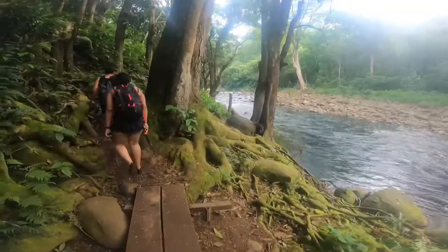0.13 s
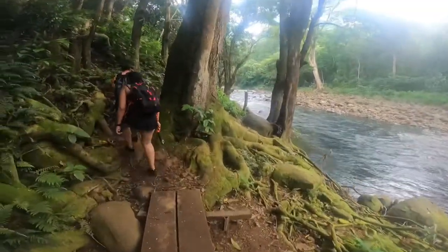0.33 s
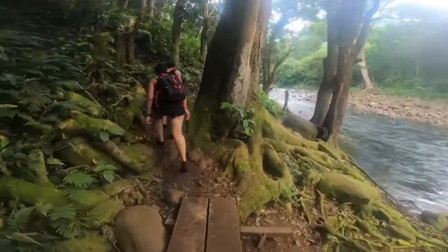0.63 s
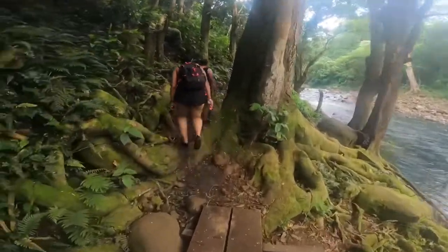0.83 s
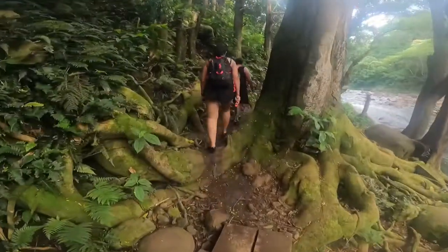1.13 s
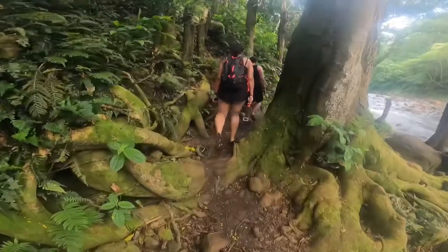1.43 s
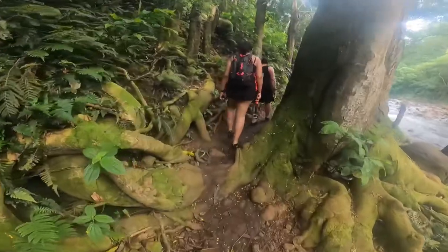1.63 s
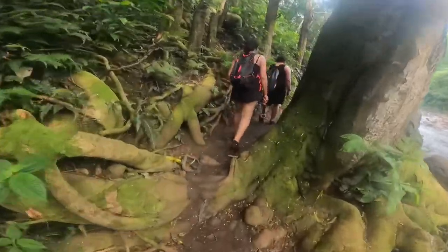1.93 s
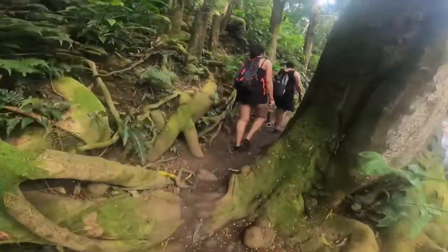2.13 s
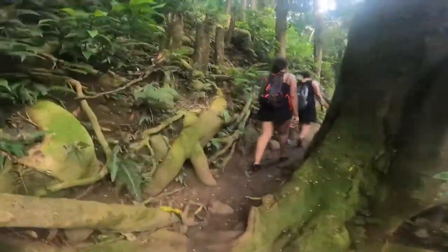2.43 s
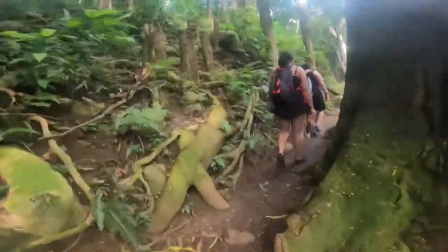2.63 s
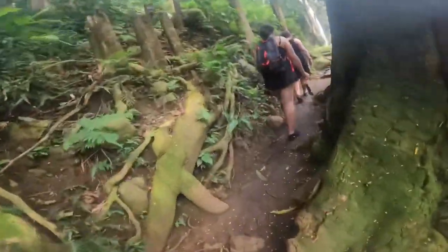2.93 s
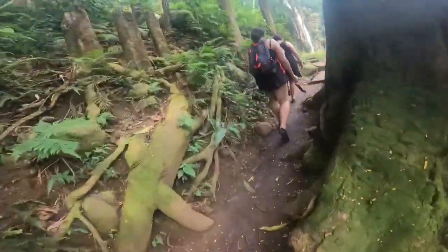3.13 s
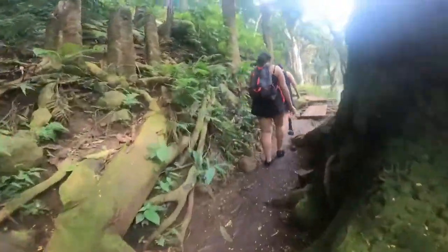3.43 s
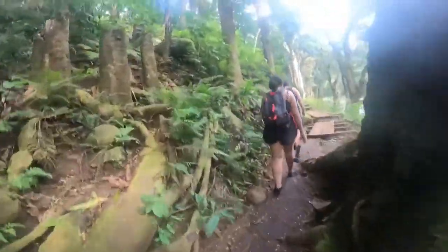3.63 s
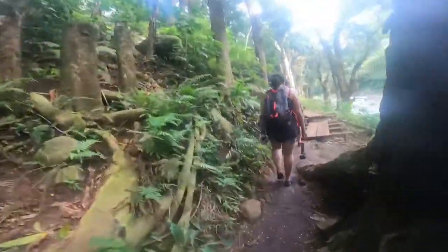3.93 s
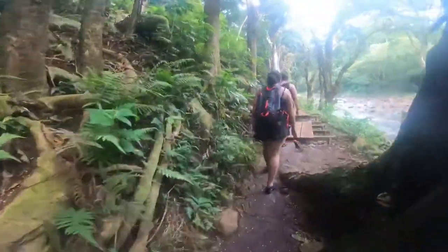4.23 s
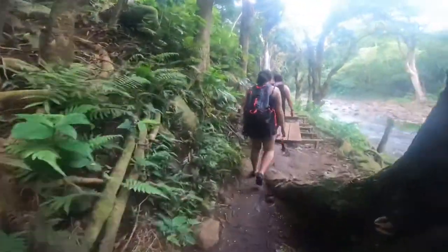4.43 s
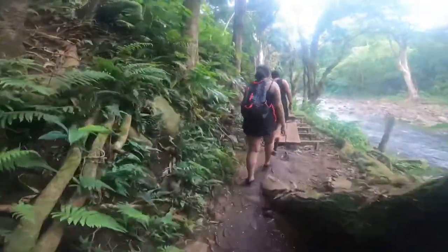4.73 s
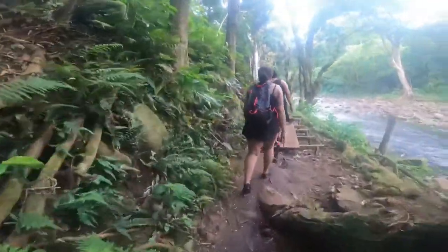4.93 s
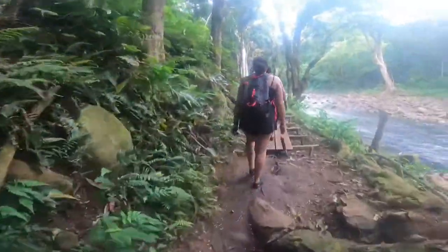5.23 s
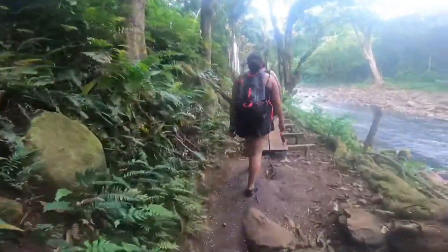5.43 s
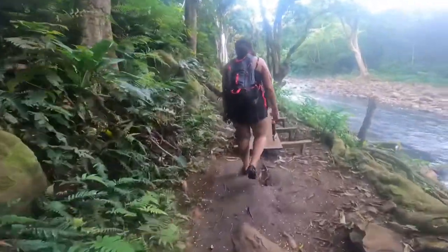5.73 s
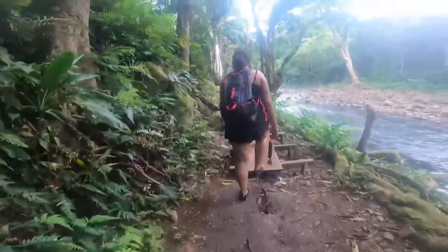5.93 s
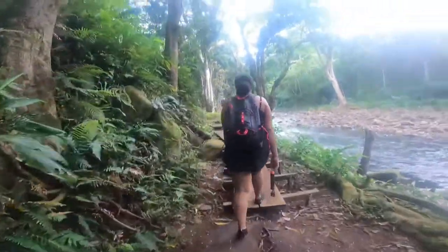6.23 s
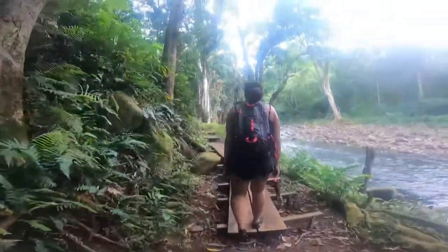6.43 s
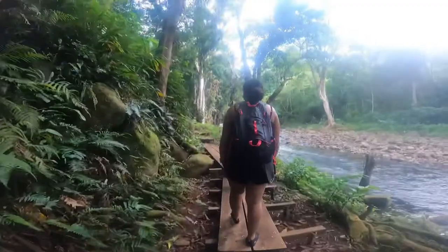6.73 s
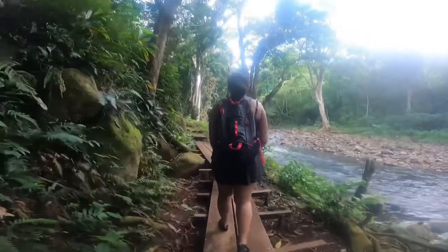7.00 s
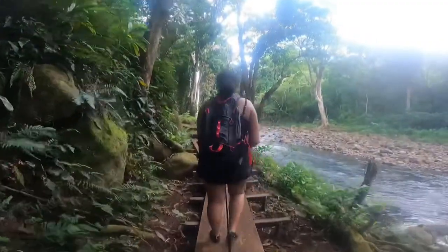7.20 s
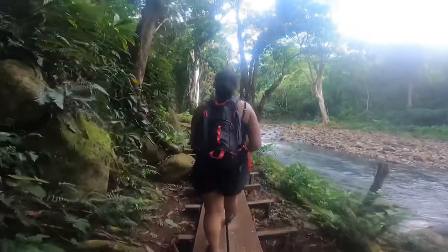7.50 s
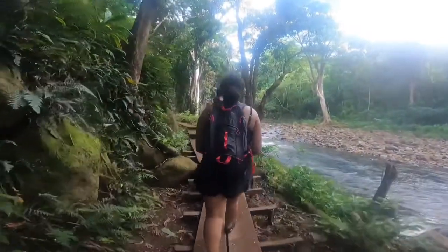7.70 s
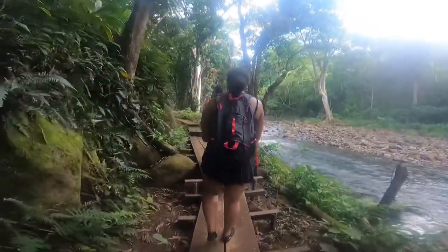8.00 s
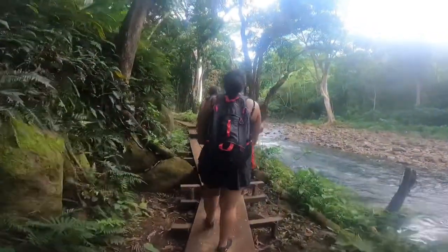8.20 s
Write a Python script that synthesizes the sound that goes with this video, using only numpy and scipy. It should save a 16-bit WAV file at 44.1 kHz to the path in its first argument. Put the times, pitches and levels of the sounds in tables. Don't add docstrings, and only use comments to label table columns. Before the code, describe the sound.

Close, boxy handling noise dominates: pole thumps and brief low ringing at uneven walking steps, skin rubbing on plastic, soft hollow knocks and dry joint clicks. A hard clack comes early, heavy bumps follow in the middle, then lighter ones with another loud click near the end. A tiny twig snap and soft leaf brush are nearly hidden. Behind them, a shallow river gives a faint continuous wash, slightly clearer later. Stereo microphones sit inside a sealed plastic case outdoors.

```python
import sys
import numpy as np
from scipy import signal
from scipy.fft import rfft, irfft, next_fast_len
from scipy.io import wavfile
from scipy.ndimage import uniform_filter1d

SR = 44100
rng = np.random.default_rng(int(sys.argv[2]) if len(sys.argv) > 2 else 0)


def waveform_to_disk(signal):
    frames = np.transpose(np.atleast_2d(signal))
    scaled = np.clip(frames, -1, 1) * 32767
    samples = np.round(scaled).astype(np.int16)
    wavfile.write(sys.argv[1], SR, samples)


def invert_db(x):
    u = np.asarray(x, float) / 20
    return 10 ** u


N = 368676

# time in seconds, peak in dB, low modes and upper modes in dB
# against that peak, left minus right in dB.
CLICKS = [(0.404, -23, -23, -14, -18), (0.693, -21.5, -16, -11, -2), (1.308, -11, -20, -6, 0),
          (1.417, -24, -22, -14, 1), (1.89, -26, -32, -7, 3), (2.892, -29.5, 2, -5, -7),
          (3.621, -23.5, -26, -13, -3), (3.663, -32, -21, 2, -4.0), (3.672, -23.5, -31, -4.5, -9),
          (3.737, -33.5, -6, 6, 2.0), (4.468, -25, -19, -1, -4.5), (4.475, -23, -16, -10, -13),
          (4.491, -15.5, -32, -4, 7), (4.53, -27, -12, -7, 5), (4.561, -30, -21, 5, 1),
          (4.58, -22.5, -27, -4, 6), (4.733, -29, -3, -13, 7), (4.7763, -11.5, -4, -4, 5.5),
          (4.91, -27.5, -9, 1, 19), (5.37, -18.5, -30, -7, 4), (5.394, -28, -14, -4, 6),
          (5.453, -13.5, -22, -4.5, 7), (2.531, -26, -10, 2, 2), (2.549, -23, -10, 2, 2),
          (4.614, -32, -20, 4, 2), (4.955, -31, -20, 4, 2), (6.195, -22.5, -4, 2, -5),
          (7.334, -13, -3.5, -7.5, -1), (2.496, -31, -20, 6, 3), (2.968, -31, -20, 5, 2),
          (3.099, -34, -20, 7, 2), (5.665, -32, -20, 5, 2)]
# time in seconds, peak in dB.
JOLTS = [(0.689, -34), (1.309, 1), (1.884, -13), (2.464, -5), (3.235, -9.5), (3.267, -4.5), (3.776, -6),
         (4.841, -7), (5.746, -10), (7.014, -19.5), (7.84, -20)]
OPPOSITE = np.array([[1], [-1]])


def rms_one(x):
    return x / np.sqrt(np.mean(x ** 2) + 1e-20)


def low_pass(x, cut_hz, order):
    return signal.sosfilt(signal.butter(order, cut_hz, fs=SR, output="sos"), x)


def band(x, low_hz, high_hz):
    return signal.sosfilt(signal.butter(2, [low_hz, high_hz], "band", fs=SR, output="sos"), x)


def steady(x, window_s, share):
    power = np.atleast_2d(rms_one(x) ** 2).mean(axis=0)
    power = uniform_filter1d(power, int(window_s * SR))
    return rms_one(x / (power + .02) ** (.5 * share))


def drift(rate_hz):
    r = np.exp(-80 * np.pi * rate_hz / SR)
    white = rng.standard_normal(N // 40 + 2002)
    slow = signal.lfilter([1], [1, -2 * r, r * r], white)[2000:]
    return np.interp(np.arange(N) / 40, np.arange(len(slow)), rms_one(slow))


def resonate(x, hz, width_hz):
    r = np.exp(-np.pi * width_hz / SR)
    feedback = [1, -2 * r * np.cos(2 * np.pi * hz / SR), r * r]
    return signal.lfilter([(1 - r * r) / 2, 0, (r * r - 1) / 2], feedback, x)


def body(x, modes, flicker_db=0):
    out = 0
    for k, (hz, width_hz, left_db, right_db) in enumerate(modes):
        level_db = np.array([[left_db], [right_db]])
        if flicker_db:
            level_db = level_db + flicker_db * drift(10.3)
        out = out + (-1) ** k * invert_db(level_db) * resonate(x, hz, width_hz)
    return out


def grains(per_s, spread_db):
    sizes = invert_db(spread_db * np.minimum(rng.exponential(1, N), 4)) * rng.choice([-1, 1], N)
    return rms_one(sizes * (rng.random(N) < per_s / SR))


def ring(hits, hz, t60_s):
    r = invert_db(-60 / (t60_s * SR))
    w = 2 * np.pi * hz / SR
    return signal.lfilter([0, np.sin(w)], [1, -2 * r * np.cos(w), r * r], hits + 1e-18)


def hit_train(times, levels_db):
    hits = np.zeros(N)
    hits[(np.atleast_1d(times) * SR).astype(int)] = invert_db(levels_db)
    return hits


def around(times, before_s, after_s, depth_db):
    dip = np.zeros(N)
    for s, db in zip(times, depth_db + 0 * times):
        span = slice(round((s - before_s) * SR), round((s + after_s) * SR))
        dip[span] = np.minimum(dip[span], db)
    return uniform_filter1d(dip, 150)


def before_jolt_db():
    s = np.array(JOLTS)[:, 0]
    first_contact = np.diff(s, prepend=0) > .1
    return around(s[first_contact], .035, 0, -10)


def swells(times, peaks_db, falls_s, shape):
    rise_share, roundness, rest_db = shape
    since = np.arange(0, N + 32, 32) / SR - times[:, None]
    away = np.where(since < 0, -since / rise_share, since) / falls_s[:, None]
    events = invert_db(2 * (peaks_db[:, None] - 20 * away ** roundness))
    return np.vstack([events, invert_db(2 * rest_db) + 0 * since[0]])


def per_sample(x):
    return np.interp(np.arange(N) / 32, np.arange(len(x)), x)


def envelope(*events):
    return per_sample(np.sqrt(swells(*events).sum(axis=0)))


def pole():
    # peak time in seconds, level in dB, seconds to fall 20 dB.
    swings = [(0.165, -24.5, 0.325), (0.338, -20.7, 0.049), (0.496, -27.8, 0.146), (0.686, -14.6, 0.036),
              (0.808, -28.8, 0.397), (1.183, -26.6, 0.379), (1.318, -18.8, 0.047), (1.84, -28.2, 0.151),
              (1.847, -35.9, 0.582), (1.983, -20.3, 0.062), (2.334, -32.5, 0.107), (2.63, -27.2, 0.44),
              (3.076, -29.5, 0.129), (3.283, -24.8, 0.031), (3.441, -27.5, 0.344), (3.828, -26.3, 0.268),
              (4.251, -21.8, 0.405), (4.451, -20.6, 0.101), (4.844, -21.7, 0.336), (5.228, -28.3, 0.464),
              (5.299, -17.8, 0.03), (5.9, -31, 0.2), (6.183, -31.7, 0.157), (6.42, -25.3, 0.086),
              (6.56, -35.2, 0.357), (6.91, -33.0, 0.287), (7.076, -20.3, 0.117), (7.533, -36.7, 0.476),
              (2.19, -35, .06), (2.68, -23, .08), (3.44, -23, .06), (5.86, -25, .09), (7.62, -27, .1),
              (7.71, -30, .06), (7.99, -40, .06), (4.35, -24, .07), (4.3, -23, .05), (7.831, -26.6, 0.053),
              (8.287, -26.8, 0.208)]
    # peak time in seconds, level in dB, seconds to fall 20 dB.
    thuds = [(0.208, -32.2, 0.25), (0.508, -28.4, 0.036), (0.948, -39.1, 0.427), (1.315, -25.8, 0.189),
             (1.854, -29.1, 0.131), (2.19, -32.8, 0.043), (2.477, -19.2, 0.11), (2.583, -11.9, 0.09),
             (2.889, -29.0, 0.377), (3.063, -25.7, 0.033), (3.243, -28.7, 0.492), (3.257, -6.6, 0.056),
             (3.801, -19.3, 0.149), (4.116, -40.8, 0.12), (4.446, -27.6, 0.11), (4.838, -27.8, 0.384),
             (4.844, -10.7, 0.057), (4.971, -19.3, 0.025), (5.284, -32.0, 0.032), (5.406, -32.2, 0.157),
             (5.75, -15.5, 0.069), (6.193, -31.4, 0.226), (6.429, -31.8, 0.171), (6.757, -27.9, 0.103),
             (7.015, -22.0, 0.095), (7.389, -47.7, 0.455), (0.295, -27, .035), (1.31, -21, .04),
             (1.885, -32, .04), (2.79, -33, .04), (3.46, -34, .05), (5.12, -37, .05), (6.16, -33, .05),
             (6.33, -35, .04), (7.52, -42, .05), (2.31, -48, .05), (7.855, -30.9, 0.077),
             (8.326, -23.2, 0.096)]
    # peak time in seconds, level in dB,
    # seconds to fall 20 dB, pitch in Hz.
    bend_events = [(0.21, -35.8, 0.1, 114.9), (0.708, -28.5, 0.065, 120.0), (0.955, -34.0, 0.331, 124.4),
                   (1.327, -16.3, 0.112, 114.4), (1.549, -37.6, 0.055, 117.1), (1.877, -28.1, 0.147, 114.2),
                   (2.485, -12.6, 0.065, 117.8), (2.62, -17.0, 0.062, 112.8), (2.851, -17.6, 0.088, 120.4),
                   (2.945, -13.7, 0.074, 122.1), (3.1, -31.0, 0.048, 115.3), (3.249, -26.0, 0.27, 114.7),
                   (3.687, -31.3, 0.241, 114.3), (3.801, -18.9, 0.064, 118.9), (3.993, -29.9, 0.087, 120.8),
                   (4.189, -26.7, 0.075, 107.7), (4.403, -33.8, 0.38, 118.5), (4.86, -18.6, 0.04, 104.1),
                   (4.93, -29.4, 0.535, 121.7), (4.969, -18.6, 0.057, 118.9), (5.432, -28.6, 0.119, 129.2),
                   (5.79, -12.3, 0.079, 116.1), (5.997, -38.7, 0.072, 124.1), (6.24, -20.9, 0.128, 118.1),
                   (6.493, -26.9, 0.075, 113.3), (6.793, -19.1, 0.073, 114.4), (7.05, -29.8, 0.1, 114.3),
                   (0.09, -40, .05, 115), (0.3, -33, .05, 118), (0.86, -34, .05, 120),
                   (1.14, -37, .05, 118), (2.24, -44, .05, 118), (2.33, -44, .05, 118),
                   (4.48, -31, .04, 118), (4.57, -32, .05, 118), (5.29, -32, .05, 118),
                   (6.61, -46, .05, 118), (7.15, -26, .06, 118), (7.24, -31, .06, 118),
                   (7.54, -30, .05, 120), (7.7, -46, .05, 118), (8.18, -41, .05, 118),
                   (7.4, -18.4, 0.11, 114.8), (7.87, -35.6, 0.057, 113.7), (8.34, -20.8, 0.11, 114.9)]
    # frequency in Hz, level in dB, t60 in seconds.
    pole_modes = [(75, -17, 0.18), (380, -5, .05)]
    bend_shape = (.76, 1.34, -59)
    quiet = invert_db(before_jolt_db())
    white = rng.standard_normal((2, N))

    sway = steady(band(white[0], 9.0, 27.5), 0.032, 0.77)
    sway = sway * envelope(*np.transpose(swings), (.52, 2.5, -46))
    thud = steady(band(white[1], 52.0, 112.7), .03, 0.44)
    thud = thud * envelope(*np.transpose(thuds), (.57, 1.09, -66))
    thud = low_pass(thud, 165, 2)

    *bends, hz = np.transpose(bend_events)
    power = swells(*bends, bend_shape)[:-1] + 1e-12
    pitch_hz = per_sample(hz @ power / power.sum(axis=0))
    pitch_hz = pitch_hz * (1 + 0.0423 * drift(14.56))
    bent = envelope(*bends, bend_shape) * invert_db(2.5 * drift(10.0)) * quiet * np.sqrt(2)

    hits = hit_train(*np.transpose(JOLTS))
    kick_db, kick_t60_s, kick_rise_s = -5, .075, .003
    fall, rise = invert_db(-60 / (kick_t60_s * SR)), np.exp(-1 / (kick_rise_s * SR))
    softened = signal.lfilter([1 - rise], [1, -rise], hits + 1e-18)
    kicked = invert_db(kick_db) * signal.lfilter([1], [1, -fall], softened)
    bend = np.hypot(bent, kicked) * np.sin(2 * np.pi * np.cumsum(pitch_hz) / SR)

    struck = sum(invert_db(level_db - 12.5) * ring(hits, hz, t60_s) for hz, level_db, t60_s in pole_modes)
    return (sway + thud * quiet + bend + struck) * invert_db(0.17 * OPPOSITE)


def rub():
    # peak time in seconds, level in dB, seconds to fall 20 dB,
    # brightness in dB.
    scuffs = [(0.896, -34.4, 0.14, -6.5), (1.306, -25, 0.067, -3.6), (1.898, -30.4, 0.039, 3.2),
              (2.561, -16.5, 0.085, 0.6), (2.63, -18.2, 0.037, -6.3), (3.248, -20.2, 0.09, -9.9),
              (3.803, -24.9, 0.069, -1.6), (4.15, -29.4, 0.075, -4.9), (4.85, -16.0, 0.038, -18.1),
              (5.442, -34.4, 0.081, 3.2), (5.771, -28.7, 0.098, 0.0), (6.203, -25.9, 0.118, -1.6),
              (6.756, -28.4, 0.08, -2.5), (7.03, -28.8, 0.069, -5.6), (7.337, -27.3, 0.033, -13.6),
              (8.324, -27.3, 0.136, -5.0)]
    fidgets = [(0.079, -33.1, 0.035, 0.3), (0.166, -40.2, 0.063, 0.5), (0.272, -40.2, 0.039, 2.7),
               (0.672, -32.4, 0.072, -18.3), (1.239, -36.1, 0.114, -1.6), (1.658, -38.4, 0.089, -16.3),
               (1.961, -40.1, 0.073, 0.4), (2.446, -33.0, 0.137, -10.8), (2.751, -32.4, 0.082, -2.3),
               (2.829, -30.6, 0.079, -2.9), (2.925, -27.4, 0.062, -2.9), (3.04, -39.4, 0.145, -2.4),
               (3.513, -39.2, 0.288, -13.9), (3.757, -31.4, 0.078, -7.8), (3.954, -41.8, 0.215, -12.4),
               (4.287, -33.1, 0.115, -13.1), (4.462, -36.1, 0.182, -4.8), (4.666, -35.6, 0.085, -5.1),
               (4.735, -31.0, 0.119, -4.6), (4.903, -26.0, 0.051, -11.0), (4.952, -35.3, 0.134, -3.4),
               (5.979, -36.6, 0.059, 0.7), (6.321, -32.0, 0.038, 0.5), (6.464, -35.1, 0.191, -4.7),
               (7.088, -34.0, 0.057, -3.3), (7.518, -34.7, 0.054, -3.4), (7.581, -31.0, 0.034, -13.9),
               (0.7, -36, .03, -10), (0.95, -33, .04, -10), (1.14, -48, .04, -5), (1.53, -49, .04, -5),
               (2.497, -36, .03, 4), (2.97, -42, .02, 6), (3.1, -46, .02, 8), (3.13, -46, .02, 8),
               (3.45, -37, .04, -10), (3.56, -44, .03, 5), (4.06, -44, .03, 0), (5.07, -42, .03, -10),
               (5.14, -44, .04, -10), (5.25, -46, .04, -8), (5.33, -46, .04, -5), (5.67, -48, .02, 10),
               (5.89, -41, .03, -8), (6.44, -32, .04, -8), (6.93, -50, .03, 8), (7.4, -45, .04, -10),
               (7.9, -42, .03, -8), (7.824, -45.0, 0.336, -10.6), (8.119, -45.2, 0.18, -1.4)]
    # frequency in Hz, width in Hz, left in dB, right in dB.
    grip_low = [(212, 117.8, -14, -11.5), (314.4, 29.7, -7.5, 0), (358, 42, -1, -1.5), (413, 42.6, -1.5, 1),
                (506, 49.9, -4.5, -3)]
    grip_high = [(740, 197, -1, 0.5), (976, 63, 11, 7), (1157.4, 143, 8.5, 6.5), (1710, 240, 8, -0.5),
                 (2128, 200, 1, -12), (3035, 410, -7, -13), (3660, 200, -13, -13), (5560, 2100, -25, -27)]
    grip_twist = [(517, 135, -7.5, -10), (728, 100, -18, -17.5)]
    rise, roundness, rest_db = (.6, 1.76, -59)
    bright_at_rest_db = 3
    times, rub_db, falls_s, bright_db = np.transpose(scuffs + fidgets)

    clumps = invert_db(2.4 * drift(30.0))
    slips = grains(1400, 2.5) + 0.36 * rng.standard_normal(N)
    apart = invert_db(-9) * np.array([grains(1400, 3.0), grains(1400, 3.0)])
    soft = low_pass(clumps * (slips + apart), 5200, 4)

    s, peak_db = np.transpose(CLICKS)[:2]
    dip_db = around(s, .025, .025, -np.clip(1.2 * (peak_db + 32), 3, 5))

    low = steady(body(soft, grip_low) - OPPOSITE * body(soft, grip_twist), 0.059, 0.21)
    low = low * envelope(times, rub_db, falls_s, (rise, roundness, rest_db))
    bright = envelope(times, rub_db + bright_db, falls_s, (rise, roundness, rest_db + bright_at_rest_db))
    high = bright * steady(body(soft, grip_high), 0.023, 0.45)
    return low * invert_db(.55 * dip_db + before_jolt_db()) + high * invert_db(dip_db - 1.5)


def clicks():
    # frequency in Hz, level in dB, t60 in seconds.
    joint = [
        [(998, -2, 0.036), (1196, -1.5, .03)],
        [(561, -0.5, .04), (800, -2.5, 0.028)],
        [(1370, -10.5, 0.0094), (1690, 5, 0.013)],
        [(3500, 5.5, 0.014), (5100, -16, .012), (7200, -20, .01)],
    ]
    touch = np.pad(np.hanning(6) / np.hanning(6).sum(), (0, 3000))
    chance = rng.uniform(-1, 1, (len(CLICKS), 10))
    out = np.zeros((2, N))
    for (s, peak_db, low_db, upper_db, pan_db), draw in zip(CLICKS, chance):
        chatter_s = .0022 + .001 * draw[9]
        contact = touch + invert_db(-10) * np.roll(touch, round(chatter_s * SR))
        rung = []
        for g, group in enumerate(joint):
            total = 0
            for k, (hz, level_db, t60_s) in enumerate(group):
                lean = 1 + 0.27 * (-1) ** k * OPPOSITE
                shifted_hz = hz * (1 + .025 * draw[2 * g + k])
                total = total + invert_db(level_db) * lean * ring(contact, shifted_hz, t60_s)
            rung.append(total)
        middle, low, upper, top = rung
        top_db = -16.5 - .15 * (peak_db + 20) + np.clip(2 * (upper_db + 5), -8, 2)
        tick = middle - invert_db(low_db) * low - invert_db(upper_db) * upper + invert_db(top_db) * top
        out[:, round(s * SR):][:, :len(contact)] += invert_db(peak_db - 6.5 + OPPOSITE * pan_db / 2) * tick
    return out


def knocks():
    # start in seconds, peak in dB, pitch in Hz.
    palm_hits = [(0.932, -27, 390), (1.306, -16, 382), (2.535, -14, 361), (2.605, -16, 339),
                 (3.225, -18, 409), (3.264, -12, 404), (3.78, -17, 371), (4.131, -26, 390),
                 (4.255, -30, 436), (4.665, -26, 366), (4.84, -16, 431), (4.898, -24, 415),
                 (4.974, -28, 415), (5.752, -21, 358), (6.227, -20, 420), (6.761, -23, 487),
                 (7.031, -22, 409), (7.085, -26, 401), (7.576, -30, 398), (8.282, -23, 409)]
    level_db, t60_s, soft_s = -6, .11, .008
    t = np.arange(6000) / SR
    out = np.zeros(N)
    for s, peak_db, hz in palm_hits:
        fade = np.minimum(t / soft_s, 1) * invert_db(peak_db + level_db - 60 * t / t60_s)
        tone = fade * np.sin(2 * np.pi * hz * t)
        start = round(s * SR)
        out[start:][:len(t)] += tone[:N - start]
    return out * invert_db(-1.5 * OPPOSITE)


def undergrowth():
    # start in seconds, level in dB, frequency in Hz, t60 in seconds.
    twig_snap = [
        (3.62, -37, 5800, .014),
    ]
    # start in seconds, level in dB, frequency in Hz, t60 in seconds.
    leaf_puff = [
        (5.572, -25, 260, .035),
    ]
    s, level_db, hz, t60_s = twig_snap[0]
    snap = hit_train(s, level_db)
    twig = ring(snap, hz, t60_s) - .3 * ring(snap, 1.27 * hz, t60_s) + .14 * ring(snap, 1.55 * hz, 3 * t60_s)
    s, level_db, hz, t60_s = leaf_puff[0]
    touch = hit_train(s, level_db)
    puff = ring(touch, hz, t60_s) + 1.2 * ring(touch, 0.53 * hz, 2 * t60_s)
    puff = puff + .5 * ring(touch, 3 * hz, 0.34 * t60_s)
    return twig * invert_db(1.5 * OPPOSITE) + puff * np.array([[1], [0]])


def river():
    # time in seconds, rush in dB, dullness in dB,
    # rumble in dB.
    bank = [(0.0, -47.5, 3.5, -5), (1.4, -48, 3.5, -2), (2.2, -48.5, 2.5, -5), (2.6, -49, 2, 0),
            (3.21, -50, 1.5, 0), (4.28, -46.5, 1, 0), (5.5, -47, 3, 0), (6.5, -47.5, 0.5, 2),
            (7.0, -46, -1.5, 4), (7.92, -46.5, 2, 0), (8.36, -44.5, 0.5, 1)]
    # frequency in Hz, level in dB per Hz.
    rush = [(100, 9), (300, -9), (800, 1), (2000, -21), (3500, -7.5), (5000, -12.5), (7000, -31.5),
            (8500, -31), (10400, -36.5), (10800, -69)]
    # frequency in Hz, width in Hz, left in dB, right in dB.
    case = [(300, 296, -19, -17), (561.6, 75, -18.5, -13.5), (1107.4, 78, 0.5, -1.5), (1220, 88, 1, -2),
            (1710, 179, -0.5, -7), (1990, 360, -28, -2), (2997, 262, -2, -8), (3860, 150, -17, -14.5),
            (4540, 480, -17.5, -17), (5650, 970, -16, -15), (7210, 810, -10, -14)]
    case_twist = [(590, 200, -25.5, -40.5), (2220, 160, -11.5, 2)]
    s, *columns = np.transpose(bank)
    rush_db, dull_db, rumble_db = [np.interp(np.arange(N) / SR, s, column) for column in columns]

    common = rng.standard_normal(N) + .5 * grains(900, 2.9)
    apart = rng.standard_normal((2, N))
    water = common + invert_db(-7.5) * apart + invert_db(-0.5) * np.diff(apart, prepend=0)
    size = next_fast_len(N)
    hz = np.maximum(np.arange(size // 2 + 1) * SR / size, 1)
    rush_hz, colour_db = np.transpose(rush)
    colour = invert_db(np.interp(np.log(hz), np.log(rush_hz), colour_db))
    water = irfft(rfft(water, size) * colour, size)[:, :N]

    rumble = invert_db(rumble_db) * body(water, case[:2], flicker_db=1.1)
    low = rumble + body(water, case[2:5], flicker_db=1.1) + OPPOSITE * body(water, case_twist[:1])
    high = body(water, case[5:], flicker_db=0.82) + OPPOSITE * body(water, case_twist[1:])
    surge_db = .45 * drift(7.0)
    return invert_db(rush_db + 7.5 + surge_db) * (invert_db(dull_db) * low + high) / np.std(low + high)


def whine():
    return invert_db(-108 + 4.0 * drift(8.0)) * np.sin(2 * np.pi * 11720 * np.arange(N) / SR)


def thin_out(x, from_hz, share):
    hz, _, cells = signal.stft(x, SR, nperseg=2048)
    chance = rng.random((len(hz) // 8 + 1, cells.shape[1]))
    chance = np.repeat(chance, 8, axis=0)[:len(hz)]
    dropped = chance < share * np.clip(hz / from_hz - 1, 0, 1)[:, None] ** .5
    return signal.istft(cells * ~dropped, SR, nperseg=2048)[1][:N]


def scene():
    return pole() + rub() + clicks() + knocks() + undergrowth() + river()


def top_cut(x):
    return signal.sosfilt(signal.butter(12, 13000, fs=SR, output="sos"), x)


def record(dry):
    held = .8 * np.tanh(dry / 0.84)
    left, right = low_pass(held, 10700, 8)
    mid = thin_out((left + right) / 2 + whine(), 6000, 0.27)
    side = thin_out((left - right) / 2, 4500, .55)
    return top_cut(mid + OPPOSITE * side)


dry = scene()
out = record(dry)
waveform_to_disk(out)
```